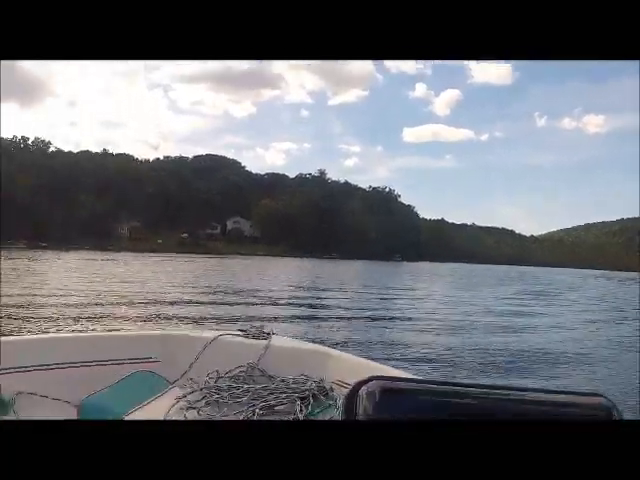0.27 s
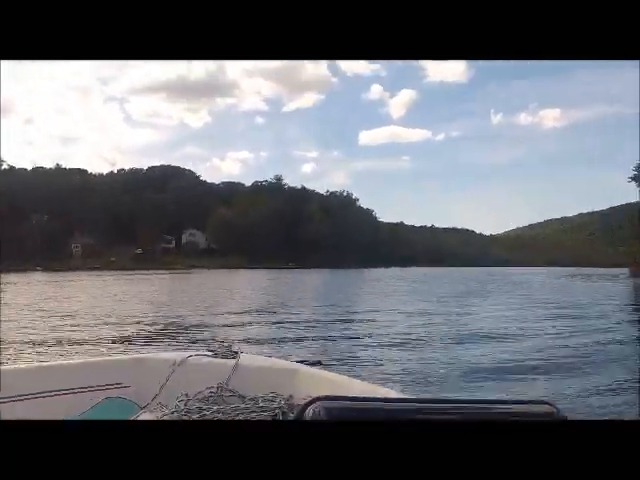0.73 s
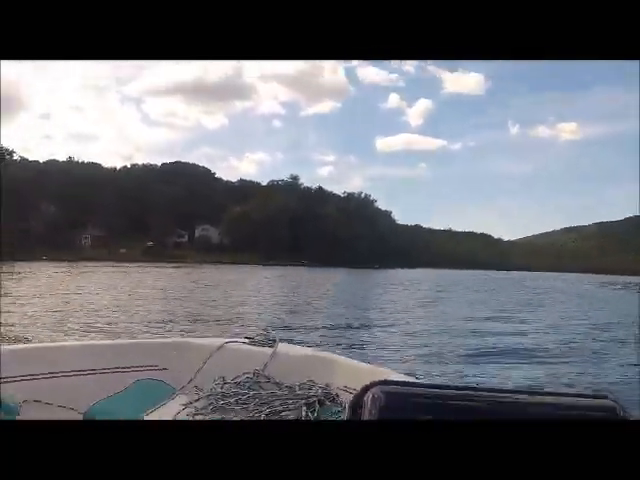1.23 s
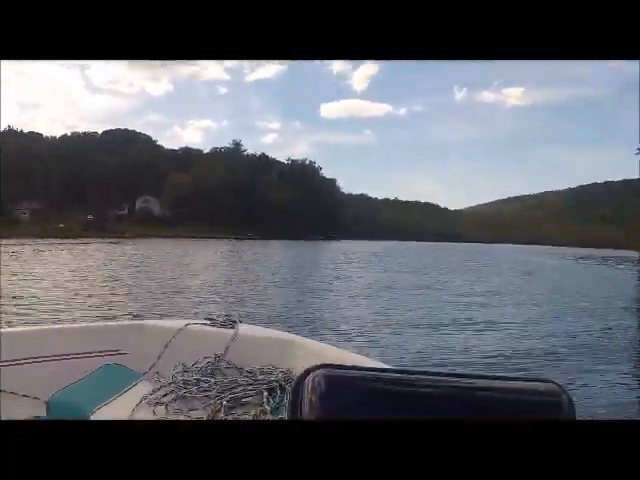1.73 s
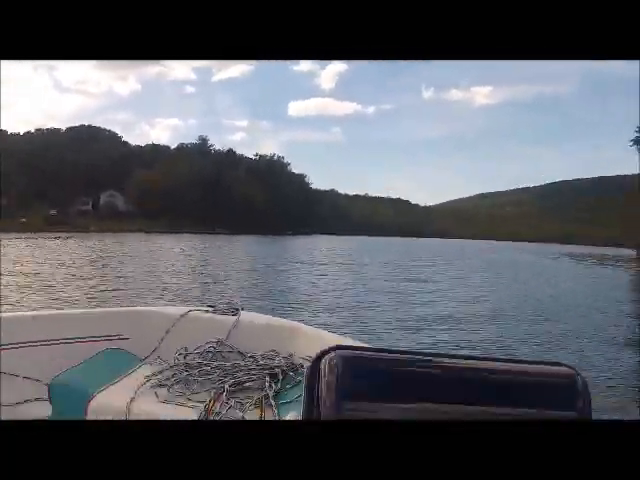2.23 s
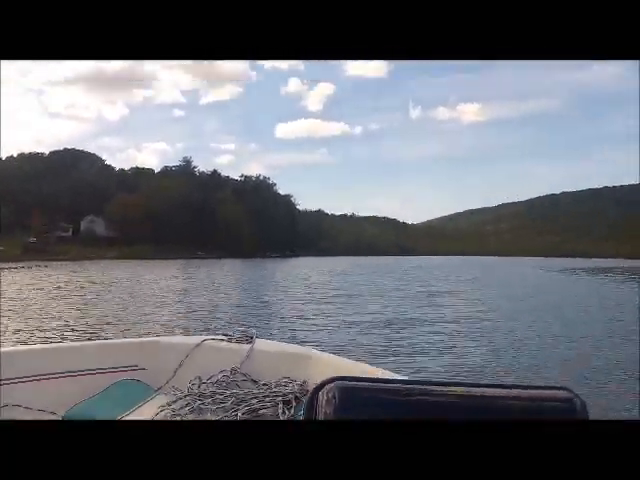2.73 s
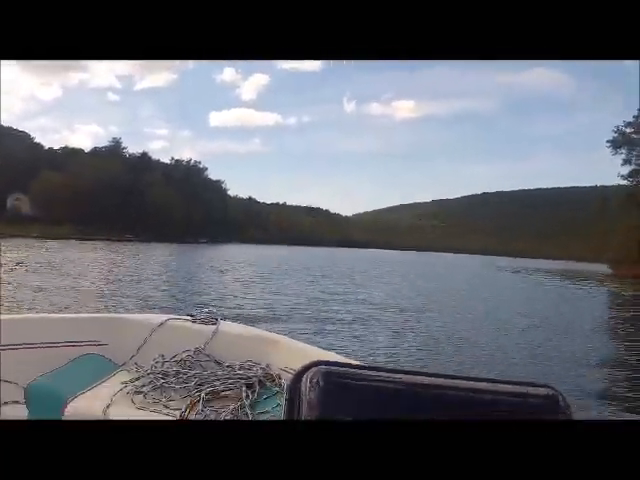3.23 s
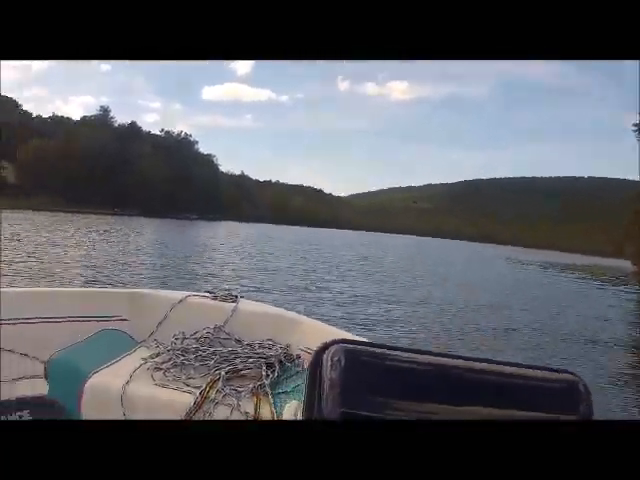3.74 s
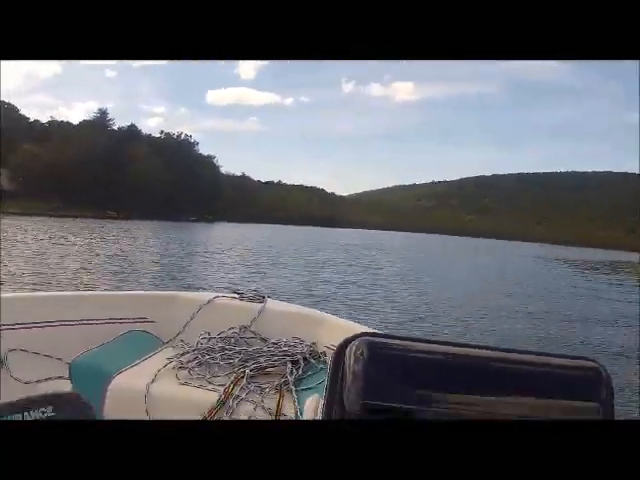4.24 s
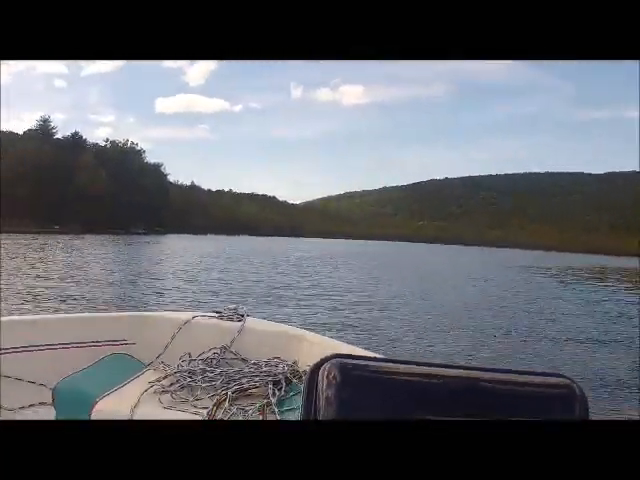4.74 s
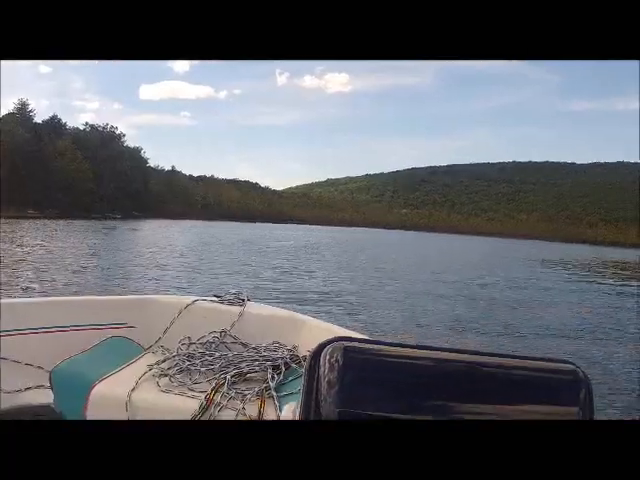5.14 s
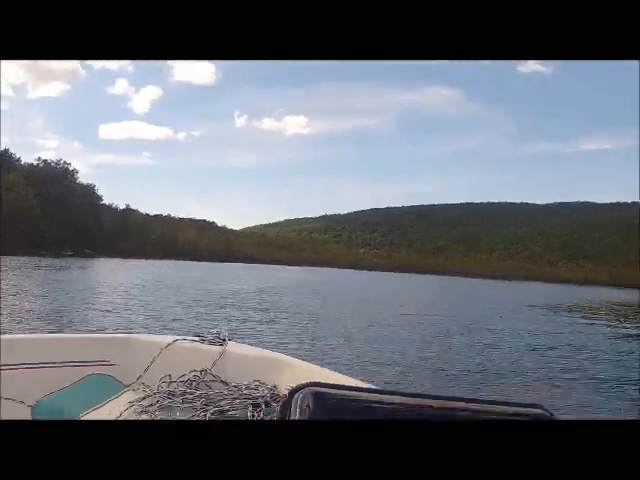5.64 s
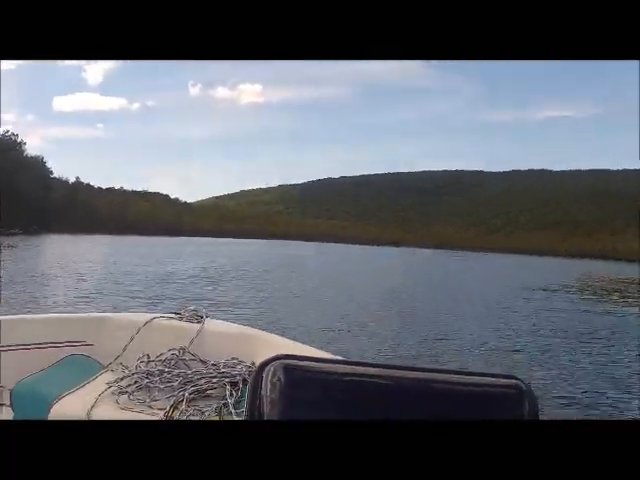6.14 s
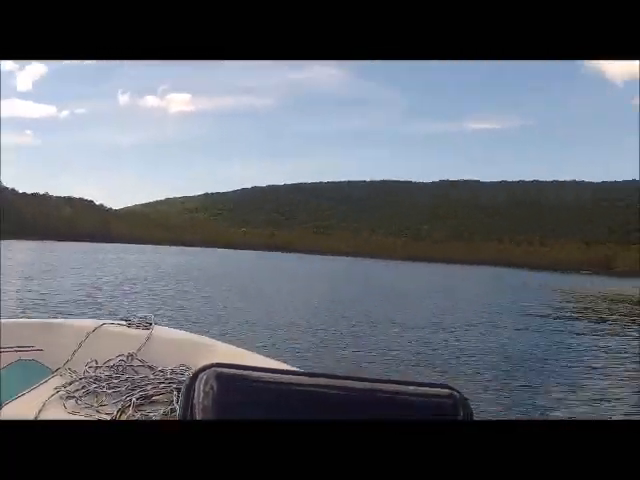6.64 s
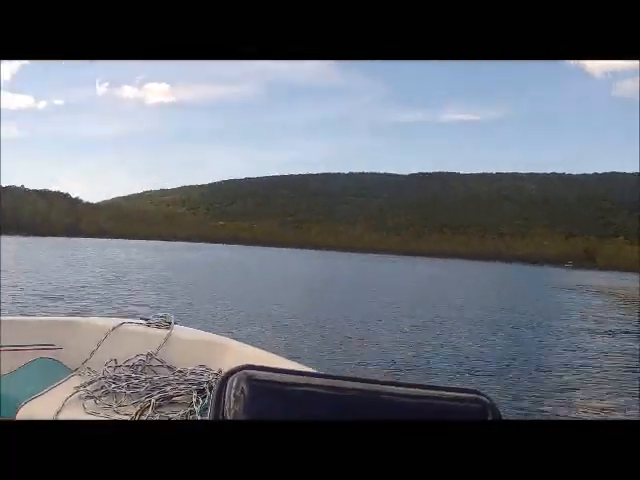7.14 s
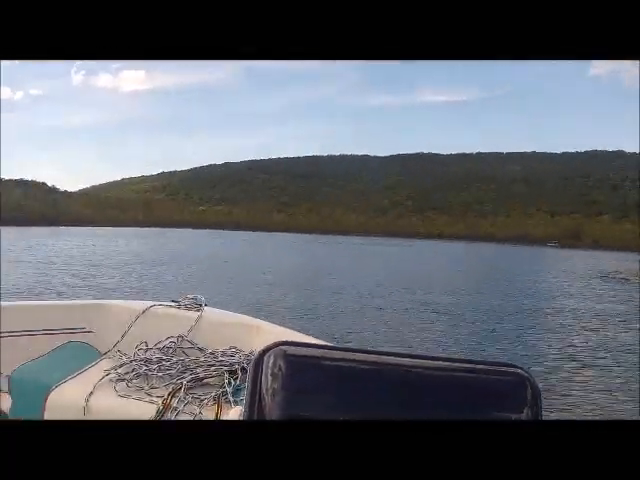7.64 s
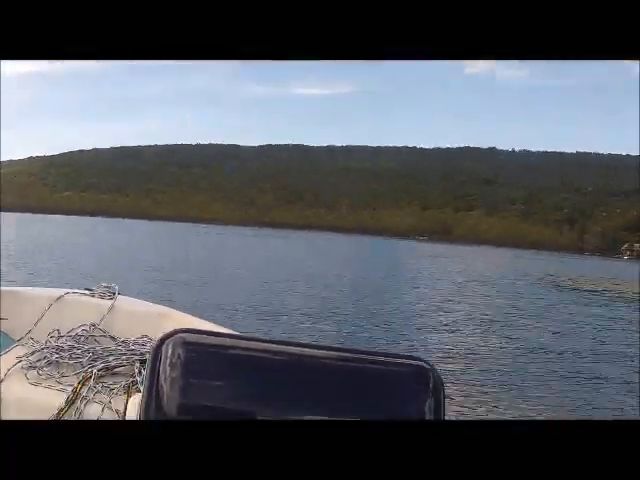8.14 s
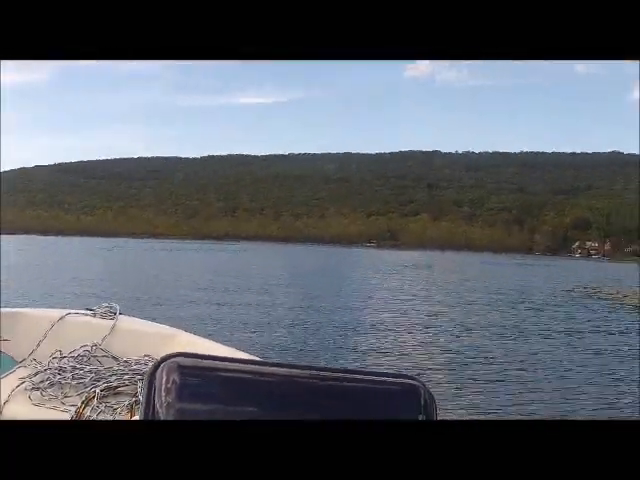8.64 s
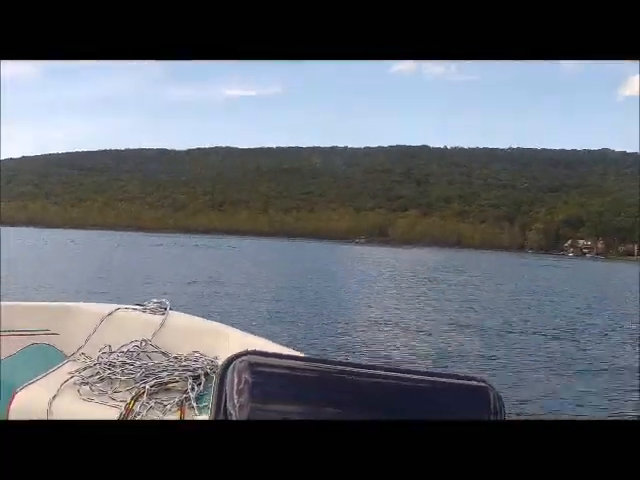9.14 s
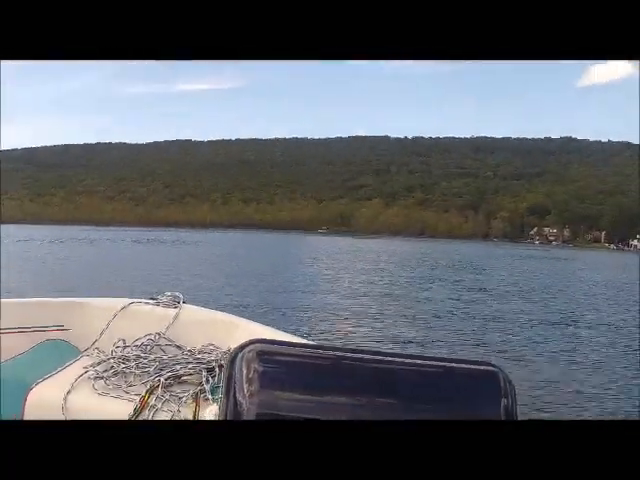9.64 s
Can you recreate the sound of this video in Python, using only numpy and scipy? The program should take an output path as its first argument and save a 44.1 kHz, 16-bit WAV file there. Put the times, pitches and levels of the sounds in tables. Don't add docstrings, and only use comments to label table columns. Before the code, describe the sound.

A small two-stroke boat engine buzzes at a steady speed on open water, with low wind rumble and spray ticking on the hull.

```python
import sys
import numpy as np
from scipy import signal
from scipy.fft import rfft, irfft, next_fast_len
from scipy.io import wavfile
from scipy.ndimage import uniform_filter1d, map_coordinates

SR = 44100
rng = np.random.default_rng(int(sys.argv[2]) if len(sys.argv) > 2 else 0)


def generate_wav(signal):
    frames = np.transpose(np.atleast_2d(signal))
    scaled = np.clip(frames, -1, 1) * 32767
    pcm = np.round(scaled).astype(np.int16)
    wavfile.write(sys.argv[1], SR, pcm)


def level_to_linear(level):
    exponent = np.asarray(level, float) / 20
    return 10 ** exponent


N = 435689


def unit(x):
    return x / np.sqrt(np.mean(x ** 2) + 1e-20)


def curves(rows):
    s, *cols = np.transpose(rows)
    return [np.interp(np.arange(N) / SR, s, c) for c in cols]


def wobble(rate, count=1):
    knots = rng.standard_normal((count, 2000))
    at = np.arange(0, N + 64, 64) * rate / SR
    coarse = [map_coordinates(k, [at]) for k in knots]
    return np.array([np.interp(np.arange(N) / 64, np.arange(len(at)), c) for c in coarse])


def swells(rows):
    t = np.arange(0, N + 64, 64) / SR
    total = sum(db * np.exp(-2 * ((t - s) / length) ** 2) for s, db, length in rows)
    return np.interp(np.arange(N) / SR, t, total)


def filtered(x, response):
    m = next_fast_len(N + SR // 4)
    return irfft(rfft(x, m) * response(np.fft.rfftfreq(m, 1 / SR)), m)[..., :N]


def colour(points):
    f, db = np.transpose(points)
    return lambda hz: level_to_linear(np.interp(np.log(hz + 1), np.log(f + 1), db))


def resonances(modes, sharper):
    def response(f):
        total = 0
        for k, (c, w, db) in enumerate(modes):
            total = total + (-1) ** k * level_to_linear(db) * 1j * f * w / (c * c - f * f + 1j * f * w)
        return total * np.abs(total) ** sharper
    return response


def patchy(depth_db):
    z = signal.stft(rng.standard_normal(N + 512), nperseg=512)[2]
    field = uniform_filter1d(rng.standard_normal(z.shape), size=4, axis=0)
    field = uniform_filter1d(field, size=6, axis=1)
    return signal.istft(z * level_to_linear(depth_db * unit(field)), nperseg=512)[1][:N]


# (time [s], swell [dB], length [s])
GUSTS = [(0.09, 7, 0.09), (0.38, 6, 0.06), (0.65, 4.6, 0.06), (0.86, 3, 0.2), (1.51, -3, 0.06),
         (1.8, 3, 0.06), (1.92, 7, 0.1), (2.17, 5, 0.068), (2.29, 5, 0.067), (2.47, 6, 0.06),
         (2.9, 6.8, 0.09), (3.27, 2, 0.12), (3.39, 4.1, 0.04), (3.66, 10, 0.06), (4.13, 10, 0.13),
         (4.3, 3.7, 0.09), (4.63, 7, 0.08), (4.8, 7.0, 0.053), (5.27, 7, 0.2), (5.48, 2, 0.06),
         (5.84, 8, 0.06), (6.23, 6.2, 0.25), (6.68, 5, 0.13), (6.78, 7, 0.055), (8.14, 2, 0.29),
         (8.54, 5, 0.098), (8.78, 2, 0.056), (8.93, 3.5, 0.18), (9.17, 9, 0.09), (9.38, -6, 0.06)]


def gust_swell():
    return swells(GUSTS)


# (time [s], level [dB])
CALM_BUFFET = [(0.0, -33), (2.47, -35), (4.93, -37), (7.4, -33), (9.87, -38.5)]
# (frequency [Hz], density [dB per Hz])
BUFFET_COLOUR = [(5, -38), (12, -22), (25, -10), (40, 4.5), (55, 2.5), (64, -1.5), (80, -3), (110, -28),
                 (200, -47)]


def wind_buffet(gusts_db):
    level_db = curves(CALM_BUFFET)[0] + 0.95 * gusts_db + 1.1 * wobble(7.2)[0]
    push = unit(filtered(rng.standard_normal(N), colour(BUFFET_COLOUR)))
    push = push / (0.25 + np.abs(uniform_filter1d(push ** 2, size=3000))) ** 0.4
    return level_to_linear(level_db + 0.9) * unit(push)


# (time [s], level [dB])
ROAR_LEVEL = [(0, -48), (2, -45), (4, -45), (6, -45.5), (8, -45), (9.88, -44.5)]
# (frequency [Hz], density [dB per Hz])
ROAR_COLOUR = [(40, -19), (80, -2), (120, -1.5), (250, -7), (420, -12), (490, -17), (700, -22),
               (950, -22.5), (1500, -20.5), (2200, -16), (3200, -30), (5000, -68)]


def air_roar():
    roar = filtered(level_to_linear(0.57 * wobble(8.3)[0]) * patchy(depth_db=0.5), colour(ROAR_COLOUR))
    return level_to_linear(curves(ROAR_LEVEL)[0] + 9) * unit(roar)


# (time [s], peak [dB], ring [Hz])
BIG_DROPS = [(0.1136, -27, 2290), (0.1645, -23, 2300), (0.1865, -36, 2500), (0.3027, -28, 2560),
             (0.7756, -24.5, 2540), (0.9298, -28, 2520), (0.9637, -32, 2610), (1.5758, -28, 2280),
             (2.1819, -30, 2350), (2.3171, -22, 2440), (2.9637, -28, 2400), (3.4401, -29, 2410),
             (3.6361, -25, 2220), (4.0462, -28, 2340), (4.2702, -31, 2550), (4.4882, -29, 2280),
             (4.6718, -31, 2260), (5.2584, -30, 2420), (5.4804, -23, 2400), (5.6201, -23, 2480),
             (6.3071, -26, 2310), (6.4827, -23, 2490), (6.5161, -28, 2520), (6.9341, -26, 2530),
             (7.3896, -33, 2260), (7.5068, -34, 2300), (8.2167, -28, 2470), (8.4587, -27, 2550),
             (8.7894, -21, 2200), (9.4814, -30, 2250)]
SMALL_DROPS = 45
SMALL_DB, SMALL_SPREAD_DB = -29.5, 1
SMALL_HZ, SMALL_SPREAD_HZ = 2420, 130


def flecks():
    out, t = np.zeros(N + SR), np.arange(SR // 50) / SR
    when = rng.random(SMALL_DROPS) * N / SR
    size, pitch = rng.standard_normal((2, SMALL_DROPS))
    small = zip(when, SMALL_DB + SMALL_SPREAD_DB * size, SMALL_HZ + SMALL_SPREAD_HZ * pitch)
    drops = [*BIG_DROPS, *small]
    for (s, db, hz), noise in zip(drops, rng.standard_normal((len(drops), len(t)))):
        ring = level_to_linear(-60 * t / 0.016) * (1 - np.exp(-t / 0.001)) * np.sin(2 * np.pi * hz * t)
        tick = 0.74 * level_to_linear(-60 * t / 0.008) * noise
        out[round(s * SR):][:len(t)] += level_to_linear(db - 7.0) * (ring + tick)
    return filtered(out[:N], colour([(600, -30), (1500, 16.0), (3800, 7.5), (6000, -12)]))


# (time [s], swell [dB], length [s])
WAVES = [(0.11, -1, 0.04), (0.17, 4, 0.03), (0.31, -3, 0.04), (0.42, 2.9, 0.04), (0.78, -6, 0.035),
         (0.93, 4.5, 0.08), (1.32, 5.8, 0.04), (1.56, 6.5, 0.06), (1.95, 7, 0.036), (2.03, -12, 0.044),
         (2.22, 6, 0.05), (2.31, 0, 0.037), (2.5, 3.5, 0.17), (2.8, 3, 0.1), (2.91, -4.1, 0.033),
         (3.39, 3.5, 0.075), (3.71, -5.4, 0.046), (3.98, 4, 0.04), (4.68, 4.5, 0.066), (4.89, 2.6, 0.08),
         (5.39, 3, 0.045), (5.61, 4.5, 0.2), (5.75, 6.5, 0.045), (5.96, 5.5, 0.09), (6.28, 4.8, 0.06),
         (6.5, 2, 0.054), (7.04, -2, 0.06), (7.65, 5.5, 0.037), (8.45, 1, 0.06), (8.69, 1.5, 0.2)]


def wave_swell():
    return swells(WAVES)


# (frequency [Hz], density [dB per Hz])
HISS_COLOUR = [(2400, -28), (2900, -13), (3100, 0), (3300, -2), (3450, -2.5), (3600, 0), (3850, -2.5),
               (4050, -8.5), (4400, -7), (4750, -11.5), (5300, -8), (5500, -12), (5700, -15.5),
               (5950, -20.5)]
HISS_DB, HISS_FACING_DB = -47, 1.4
HISS_FOLLOWS = 0.21


def spray_hiss(turn, heading, waves_db, clumps, spatter):
    level_db = HISS_DB + HISS_FACING_DB * heading + HISS_FOLLOWS * waves_db + 0.5 * wobble(12)[0]
    shake_db = 0.9 * np.cos(turn - 0.3) + 0.5 * np.cos(2 * turn - 0.9)
    flicker_db = 0.21 * clumps + 0.45 * spatter + 0.7 * wobble(140)[0]
    fizz = level_to_linear(flicker_db + shake_db) * patchy(depth_db=0.32)
    return level_to_linear(level_db + 2.0) * unit(filtered(fizz, colour(HISS_COLOUR)))


# (time [s], level [dB])
SPRAY = [(0.0, -48), (1.64, -45), (3.29, -41.5), (4.93, -42), (6.58, -44), (8.22, -42.8), (9.87, -42.0)]
# (frequency [Hz], width [Hz], level [dB])
HULL = [
    (2250, 220, -2),
    (2520, 112, 2),
    (2670, 214, -4.5),
]


def spray_slap(waves_db, clumps, spatter):
    level_db = curves(SPRAY)[0] + 1.12 * waves_db + 0.9 * wobble(14)[0]
    drops = level_to_linear(0.5 * clumps + 2.5 * spatter) * patchy(depth_db=0.45)
    return level_to_linear(level_db - 0.16) * unit(filtered(drops, resonances(HULL, sharper=0.56)))


# (time [s], shaft turns a second [Hz])
SPEED = [(0, 73.3), (1.5, 73.27), (2.9, 73.14), (3.5, 73.02), (4.25, 73.1), (6.5, 73.12), (7.5, 73),
         (8, 72.72), (8.7, 72.86), (9.4, 72.58), (9.88, 72.7)]


def shaft_angle():
    return 2 * np.pi * np.cumsum(curves(SPEED)[0]) / SR + 0.025 * wobble(6)[0]


# (frequency [Hz], width [Hz], level [dB])
CASING = [
    (1220, 138, -11),
    (1604, 157, -7),
    (1756, 135, 1),
    (1895, 136, -1.5),
]
CLATTER_DB, CLATTER_FACING_DB = -38, 1.8
CLATTER_FOLLOWS = 0.18


def casing_clatter(turn, heading, waves_db, duck_db):
    rattle = level_to_linear(0.75 * wobble(45)[0]) * patchy(depth_db=0.5)
    rattle = filtered(rattle, resonances(CASING, sharper=0.14))
    force = 0.98 + 0.45 * wobble(50)[0]
    slaps = level_to_linear(force * (2 * np.cos(2 * turn - 1) + 1.8 * np.cos(turn + 0.2)))
    level_db = CLATTER_DB + CLATTER_FACING_DB * heading + CLATTER_FOLLOWS * waves_db + duck_db
    level_db = level_db + 0.92 * wobble(9)[0]
    return level_to_linear(level_db - 0.94) * unit(slaps * rattle)


# (multiple of shaft speed, level [dB])
ORDERS = [(1, 0.0), (2, -11.0), (3, -22.8), (4, -15.1), (5, -16.6), (6, -15.4), (7, -30.5), (8, -32.6),
          (9, -34.9), (10, -40.6), (11, -39.8), (12, -45.5), (13, -40.2), (14, -41.7), (15, -37.9),
          (16, -37.5), (17, -25.9), (18, -32.6), (19, -44.9), (20, -30.9), (21, -30.8), (22, -29.6),
          (23, -30.4), (24, -20.0), (25, -91.5), (26, -25.8), (27, -33.3)]
# (multiple of shaft speed, gain for a unit of heading [dB])
FACING = [(3, 2.5), (4, -1.5), (5, -.6), (6, -3), (8, -0.5), (26, 8.5)]
THUMP_DB = -25.5


def exhaust(turn, heading):
    tone, facing_db = np.zeros(N), {round(k): db for k, db in FACING}
    slips, sways = wobble(1.91, count=len(ORDERS)), wobble(5, count=len(ORDERS))
    for (k, db), slip, sway in zip(ORDERS, slips, sways):
        k = round(k)
        lag = 0.3 * (k - 1) ** 2 - 0.4 * (k - 1) + 0.015 * k * slip
        lag = lag + np.pi * (k in (3, 7))
        level_db = db + THUMP_DB + facing_db.get(k, 0) * heading + 3 + min(0.22 * k, 1) * sway
        tone -= level_to_linear(level_db) * np.cos(k * turn - lag)
    return tone


# (time [s], heading [-1 away to 1 facing the motor])
HEADING = [
    (0, -0.95),
    (1.3, -0.76),
    (2.6, -0.11),
    (5, 0.24),
    (7.2, 0.15),
    (8, 0.82),
    (9.88, 1),
]
DUCKS = 0.096


def scene():
    heading, waves_db, gusts_db = curves(HEADING)[0], wave_swell(), gust_swell()
    duck_db = -DUCKS * gusts_db
    turn = shaft_angle()
    clumps, spatter = wobble(22)[0], wobble(170)[0]
    air = wind_buffet(gusts_db) + air_roar()
    water = spray_hiss(turn, heading, waves_db, clumps, spatter) + spray_slap(waves_db, clumps, spatter)
    motor = casing_clatter(turn, heading, waves_db, duck_db) + exhaust(turn, heading)
    return (air + flecks() + level_to_linear(duck_db) * water + motor)[None]


# (frequency [Hz], gain [dB])
GUARD = [(5650, 0), (5780, -1.5), (5880, -4.5), (6000, -5.5)]
SAMPLE_HZ, CLOCK_HZ = 12000, 48000


def sample_and_hold(dry):
    guard = colour(GUARD)
    band = filtered(dry, lambda hz: guard(hz) * (hz < SAMPLE_HZ / 2))
    comb = 1 + 2 * np.cos(2 * np.pi * SAMPLE_HZ * np.arange(N) / SR)
    return filtered(band * comb, lambda hz: np.sinc(hz / SAMPLE_HZ) / np.sinc(hz / CLOCK_HZ))


def roll_off(x):
    return signal.sosfilt(signal.butter(12, 15360, fs=SR, output="sos"), x)


def record(dry):
    mix = sample_and_hold(dry)
    return roll_off(mix)


dry = scene()
out = record(dry)
generate_wav(out)
```